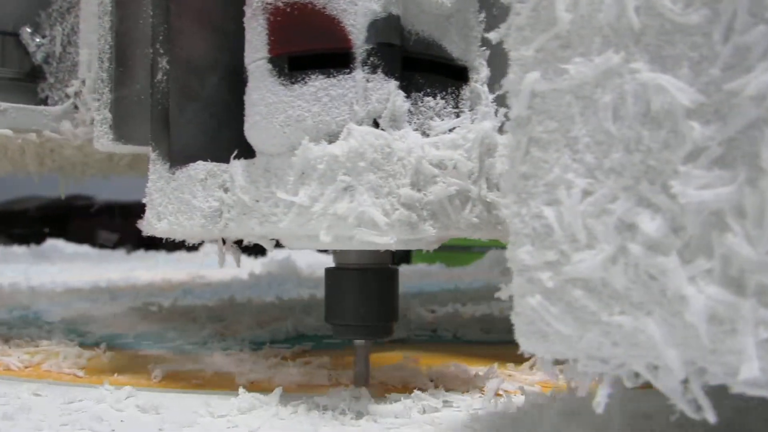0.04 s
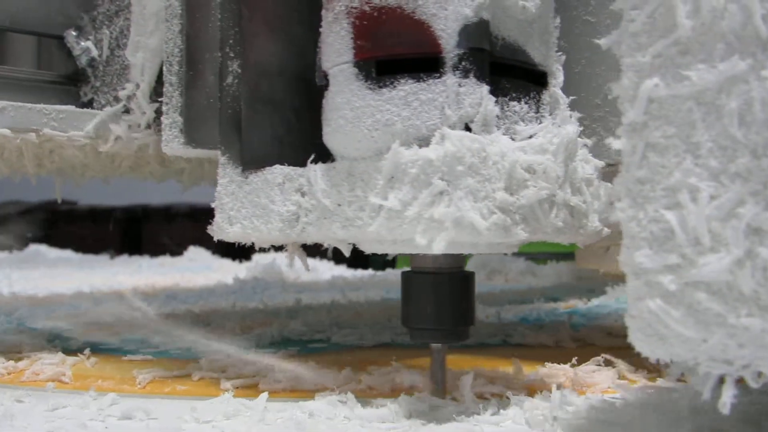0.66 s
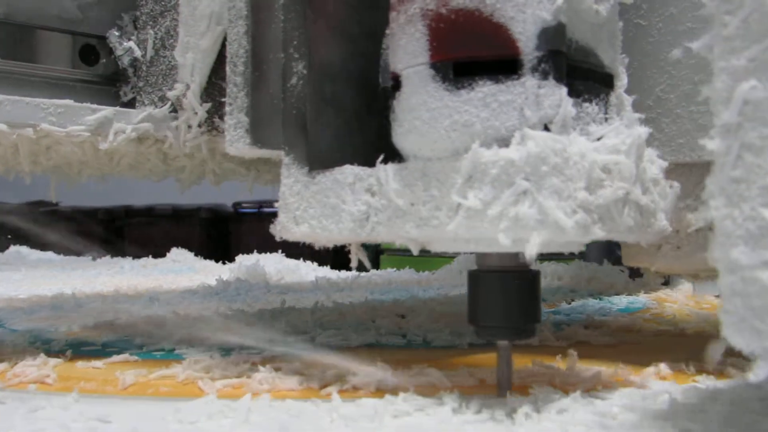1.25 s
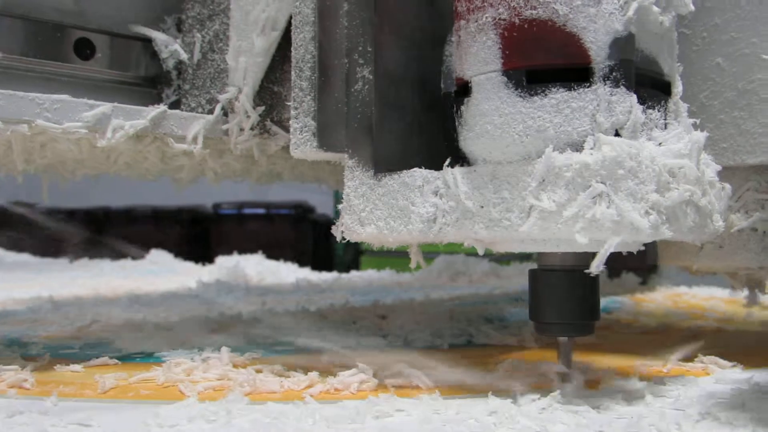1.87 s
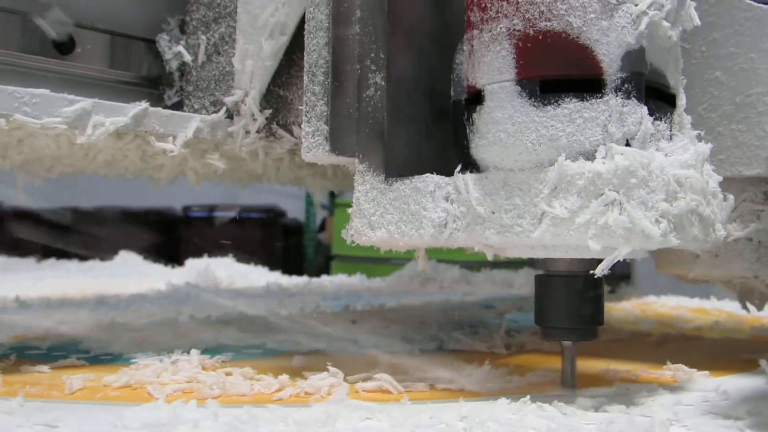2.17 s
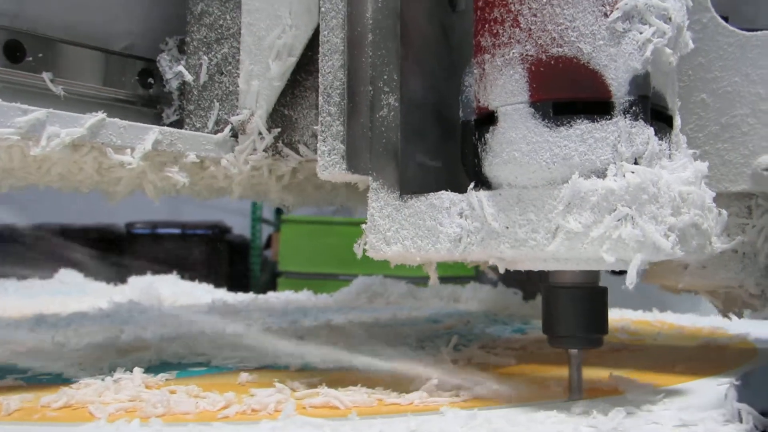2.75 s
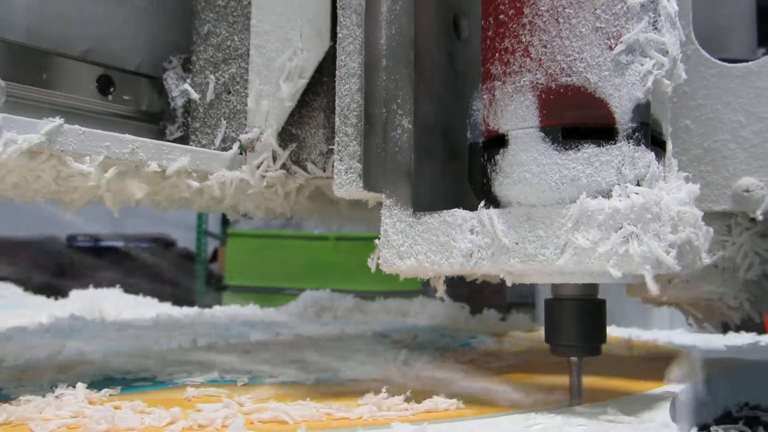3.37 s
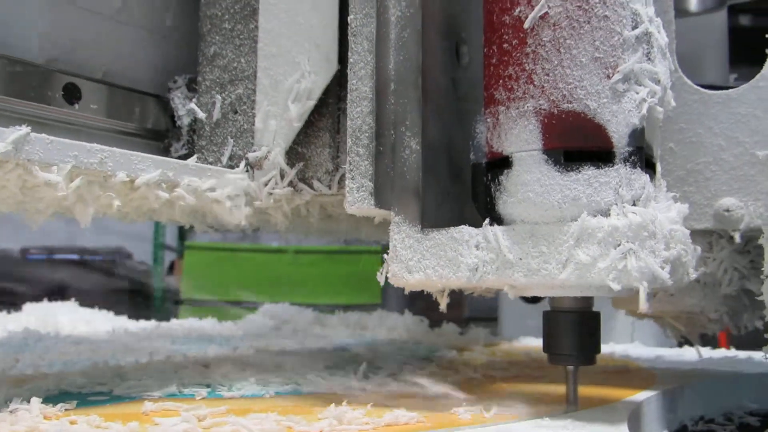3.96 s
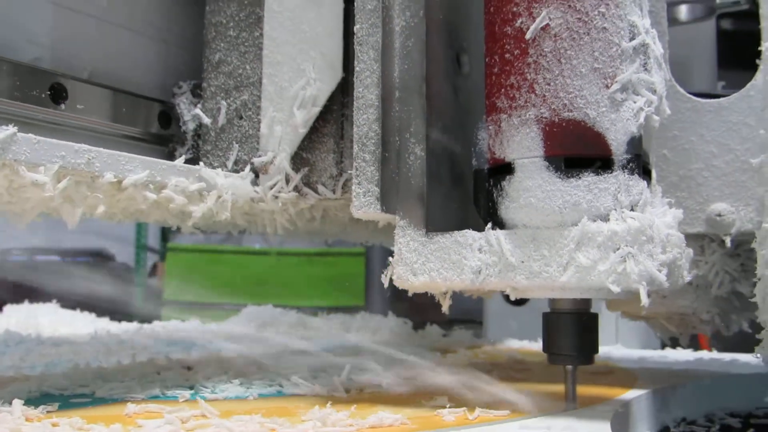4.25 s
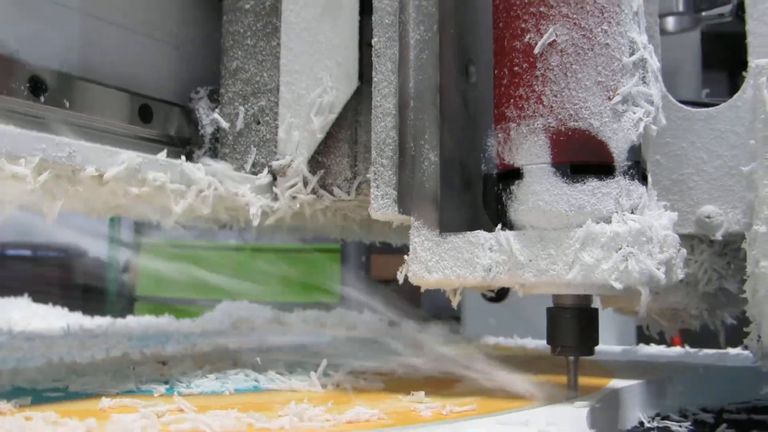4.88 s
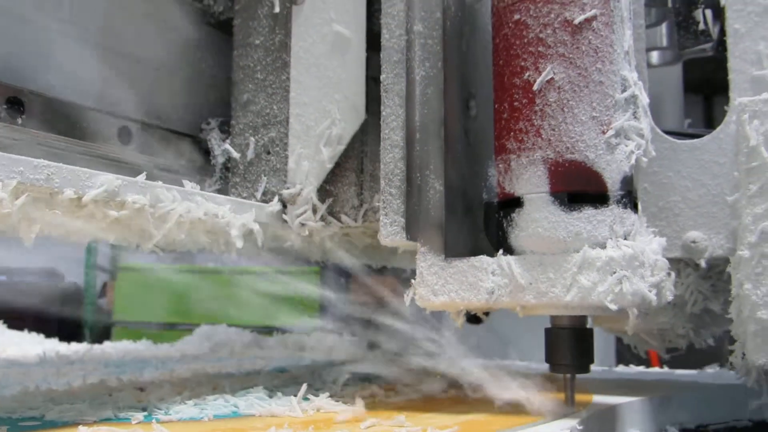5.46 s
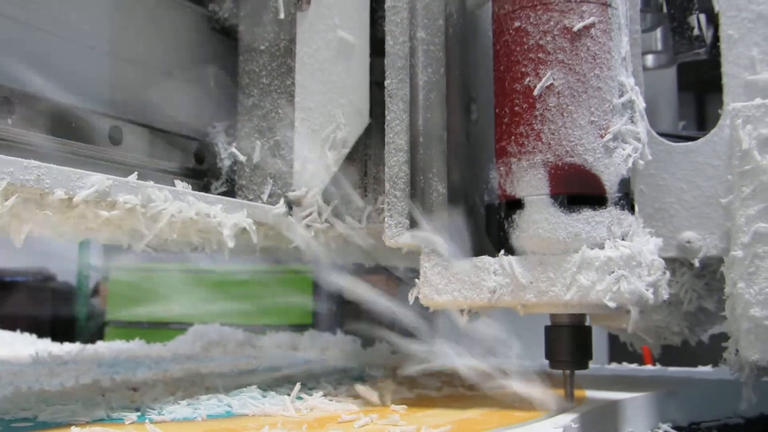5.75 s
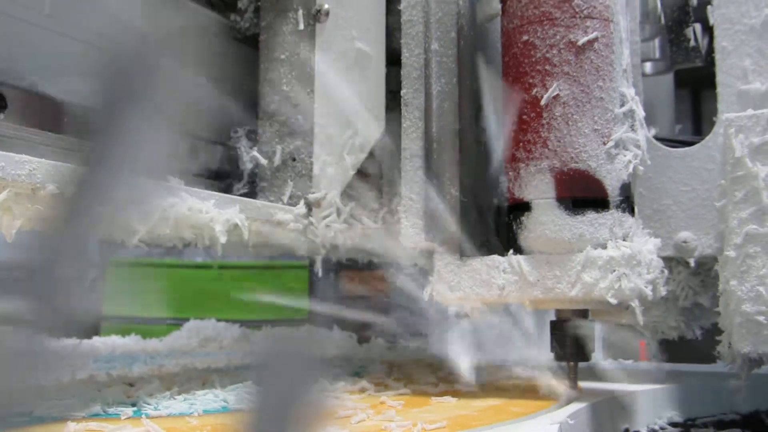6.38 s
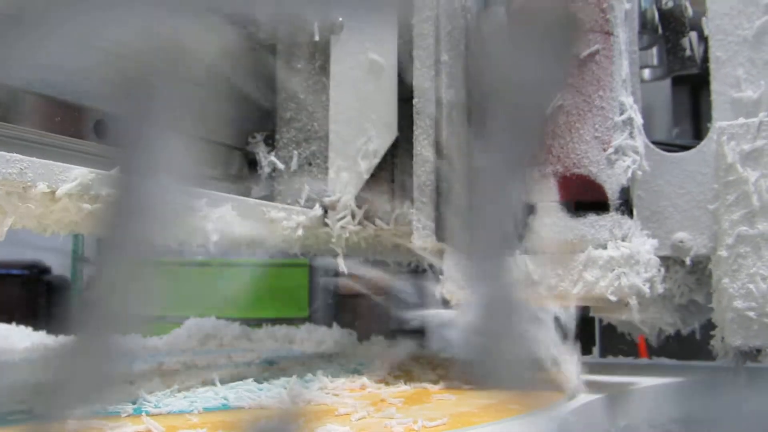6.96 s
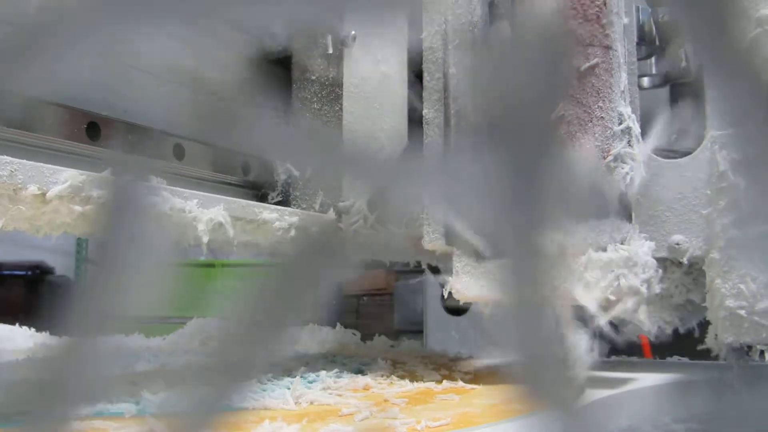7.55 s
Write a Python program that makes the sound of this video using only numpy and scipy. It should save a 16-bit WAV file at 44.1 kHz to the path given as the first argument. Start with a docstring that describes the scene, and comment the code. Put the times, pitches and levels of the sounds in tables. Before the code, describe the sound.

Close to a workshop router, a spinning bit gives a continuous whine with a growling edge as it tears through plastic with a hissing roar. Its tones swell and dip as the head travels. Draught thumps and rumbles on the microphone, hardest between two and three seconds, then eases away. Thin air whistles come and go above a faint fan hum, and the cut continues slightly softer to the end.

```python
"""A router's two-flute bit, turning about 241 times a second, sings as it cuts thick plastic sheet.
Its two flutes (cutting edges) make tones at even multiples of that rate, over the cut's roar and hiss.
As the head travels, quiet spots in the sound sweep past the microphone, an air jet whistles over the
groove, and drives and fans hum. The head's draught buffets the microphone, and a limiter turns the
volume down at the hardest slaps of air, then lets it creep back."""
import sys
import numpy as np
from scipy import signal
from scipy.fft import rfft, irfft, next_fast_len
from scipy.io import wavfile
from scipy.ndimage import uniform_filter1d, minimum_filter1d

SR = 44100
rng = np.random.default_rng(int(sys.argv[2]) if len(sys.argv) > 2 else 0)


def unload_audio(sound):
    """Save the sound as a 16-bit wav file, at the path given as the first command line argument."""
    columns = np.transpose(np.atleast_2d(sound))
    # keep every value between -1 and 1, then stretch to whole-number steps
    steps = np.round(np.clip(columns, -1, 1) * 32767)
    wavfile.write(sys.argv[1], SR, steps.astype(np.int16))


N = 340011
TIME = np.arange(N) / SR
FREQS = np.fft.rfftfreq(N, 1 / SR)


# The three strong tones, away from their quiet spots:
# name, left start/dB, left end/dB, right start/dB, right end/dB, left ear's lead/rad
BIT_TONES = [("first", -16, -17, -28, -24.2, 0.2), ("second", -15, -10.5, -18.5, -27, 0.43),
             ("third", -27.5, -22.5, -14.5, -31, -0.15)]

def flute_tones(angle, flutter_db=0.33, sway_db=0.9):
    """Two edges strike on each turn, making tones at 2, 4 and 6 times the turning rate."""
    out = np.zeros((2, N))
    for k, (tone, left_start, left_end, right_start, right_end, lead) in enumerate(BIT_TONES, 1):
        left = from_db(np.linspace(left_start, left_end, N)) * standing_wave(tone, "left")
        right = from_db(np.linspace(right_start, right_end, N)) * standing_wave(tone, "right")
        wave = np.exp(1j * (2 * k * angle + 2 * np.pi * rng.random()))
        ears = np.array([left * np.exp(1j * lead), right])
        waver = from_db(flutter_db * drift(25) + sway_db * drift(1.73))
        out += np.sqrt(2) * waver * (ears * wave).real
    return out


# Quiet spots that pass the microphone: tone, ear, t/s, signed speed/(half-widths per s),
# share of the tone left at the centre (below 0 the wave flips over)
QUIET_SPOTS = [("first", "left", 0.19, 0.24, 0.3), ("first", "right", 1, -0.54, -0.23),
               ("first", "left", 6.6, 1.7, 0.72), ("second", "left", 2.02, 0.29, 0.2),
               ("second", "right", 3, 0.54, 0.15), ("second", "left", 4.66, 0.64, 0.091),
               ("second", "right", 5.57, 1.8, -0.091), ("second", "left", 7.64, -1.5, 0.42),
               ("third", "right", 0.34, 0.72, .17), ("third", "right", 3.34, -0.6, 0.33),
               ("third", "left", 3.9, -1.03, .13), ("third", "left", 5.8, -.45, -0.14)]

def standing_wave(tone, ear):
    """A tone and its echoes partly cancel in places: each passing spot dips it and shifts its phase."""
    gain = np.ones(N, complex)
    for name, side, s, speed, share in QUIET_SPOTS:
        if (name, side) == (tone, ear):
            offset = 1j * speed * (TIME - s)
            gain *= (share + offset) / (1 + offset)
    return gain


# How fast the shaft spins: t/s, turning rate/Hz
SHAFT_SPEED = [(0, 240.92), (0.7, 241.1), (2, 241.07), (3.2, 241.29), (4.2, 241.83), (5.4, 242.48),
               (6.1, 242.54), (7.2, 242.08), (7.7, 242.03)]

def shaft_angle(jitter=0.00016):
    """How far the shaft has turned, in radians; the changing bite makes its speed tremble."""
    turns_per_s = curves(SHAFT_SPEED)[0] * (1 + jitter * drift(21.0))
    return 2 * np.pi * np.cumsum(turns_per_s) / SR


# The head's trip across the sheet: t/s, share of the trip done
HEAD_TRAVEL = [(0, 0), (1.2, 0.05), (2, 0.24), (3, 0.78), (4, 0.82), (5, 0.84), (7.7, 1)]

def progress():
    """How far the head has come, from 0 to 1; the tones and noises change with it."""
    return np.clip(curves(HEAD_TRAVEL)[0], 0, 1)


# The bit's weaker tones: multiple of the turning rate, level/dB, change over the trip/dB
GROWL_TONES = [(3, -41.5, -2.5), (5, -38, -10), (7, -35.5, 2.5), (8, -27, -9), (9, -29, -8), (10, -37, 0.5),
               (11, -36.5, -11), (12, -34.5, -5), (14, -39, -2.5), (15, -44, -5), (19, -44.5, -7)]

def growl(angle, odd_start_db=-16, odd_rise_s=0.39):
    """The bit growls; the odd multiples come in as one edge starts to bite deeper."""
    along = progress()
    odd_db = odd_start_db * np.exp(-TIME / odd_rise_s)
    return sum(shaft_tone(angle, round(multiple), db + change_db * along + round(multiple) % 2 * odd_db)
               for multiple, db, change_db in GROWL_TONES)


# How strong a whine tone starts out at each pitch: f/Hz, level/dB
WHINE_LEVELS = [(3850, -44), (4340, -40), (4800, -43), (5300, -55), (5790, -39.5), (6270, -44), (7300, -47),
                (9600, -50), (11500, -49), (12100, -41), (13500, -47)]

def whine(angle, fade_db=-8):
    """High, even multiples of the turning rate make a fine whine that fades as the head moves off."""
    faded_db = fade_db * progress()
    shaft_hz = curves(SHAFT_SPEED)[0].mean()
    hz, db = np.transpose(WHINE_LEVELS)
    return sum(shaft_tone(angle, k, np.interp(k * shaft_hz, hz, db) + faded_db) for k in range(16, 58, 2))


def shaft_tone(angle, multiple, db, waver_db=1.16, smear_rad=0.14, spread_rad=0.37):
    """One tone at a multiple of the turning rate, wavering in strength and direction."""
    phase = multiple * angle + smear_rad * drift(23) + 2 * np.pi * rng.random()
    lead = spread_rad * drift(0.79)
    return np.sqrt(2) * from_db(db + waver_db * drift(6.5)) * np.cos([phase + lead, phase - lead])


# How loud the cut is: t/s, roar/dB, hiss/dB
CUT_LEVELS = [(0, -22.5, -27), (1.1, -22.2, -25), (1.55, -21, -24.5), (2.4, -23, -26.5), (2.8, -23, -26.7),
              (3.4, -23, -26), (4.2, -23.5, -26.5), (4.9, -22.5, -26), (5.6, -23.5, -27),
              (6.7, -25.5, -29.5), (7.7, -24, -28.8)]
# The roar's colour (how strong each pitch is next to the others): f/Hz, trip start/dB, trip end/dB
ROAR_COLOUR = [(210, -19.5, -17), (302, -17.5, -9), (400, -17.5, -11.5), (640, -14, -7), (724, -6, -9),
               (1073, -6.5, -5), (1292, 0, 4.5), (1476, -8, -0.5), (1715, -3.5, 5), (2140, -6.5, -4.5),
               (2500, -9, -1), (2990, -11, -5), (3630, -10, -11), (4430, -47, -37)]
# The hiss's colour: f/Hz, trip start/dB, trip end/dB
HISS_COLOUR = [(2510, -51, -6), (3700, -1, -1.5), (4400, -1, 0), (5130, 1, 1), (5530, -4.5, 1),
               (6200, -1.5, 0), (7600, -0.5, 1.5), (8550, -1, 0.5), (9500, -1.5, -1.5), (10400, -1, 0.5),
               (10700, -4.5, -2.5), (12400, -3, -1.5), (14300, -5.5, -5), (14400, -14, -38.5)]

def cutting(hollow_hz=8400, hollow_width_hz=1500, hollow_at_s=4.4, hollow_depth=0.5):
    """The sheet roars and the chips hiss; as the head goes by, an echo off the sheet hollows the hiss."""
    roar_db, hiss_db = curves(CUT_LEVELS)
    roar = cut_noise(ROAR_COLOUR, roar_db, low_hz=160, flicker_db=0.45)
    hiss = cut_noise(HISS_COLOUR, hiss_db, low_hz=2000, flicker_db=0.47)
    cancelled = signal.lfilter(*signal.iirpeak(hollow_hz, hollow_hz / hollow_width_hz, fs=SR), hiss)
    return roar + hiss - hollow_depth * swell(TIME - hollow_at_s, spread_s=1.3) * cancelled


# How alike the cut sounds in the two ears: f/Hz, likeness (1 = the same)
EAR_LIKENESS = [(200, 0.71), (600, 0.96), (1300, 0.95), (2500, 0.77), (4000, 0.75), (7000, 0.67),
                (10000, 0.55), (14000, 0.16)]

def cut_noise(colours, db, low_hz, flicker_db):
    """Noise of tearing chips and air, blending from one colour to another as the head travels."""
    along, likeness = progress(), spectrum(EAR_LIKENESS)
    bass_cut_db = -10 * np.log10(1 + (low_hz / (FREQS + 1)) ** 4)
    start = noise_pair(spectrum(colours, column=1) + bass_cut_db, likeness)
    end = noise_pair(spectrum(colours, column=2) + bass_cut_db, likeness)
    return (np.sqrt(1 - along) * start + np.sqrt(along) * end) * from_db(db + flicker_db * drift(60))


# Breathy whistles: middle t/s, length/s, middle f/Hz, level/dB
JET_WHISTLES = [(1.7, 1.1, 10160, -35.5), (3.505, 1.1, 10100, -36), (4.902, 1.4, 10120, -39),
                (5.148, 1.8, 11960, -37.5), (6.502, 2.3, 11960, -38.5), (6.802, 1.9, 10350, -45)]

def whistles(width_hz=240, rise_hz_per_s=270):
    """The air jet crosses the groove: each narrow band of noise swells, climbs in pitch and fades."""
    out = np.zeros((2, N))
    for middle, length, hz, db in JET_WHISTLES:
        band = noise_pair(-20 * np.log10(1 + (FREQS / width_hz) ** 2), likeness=0.45)
        t = TIME - middle
        arch = np.cos(np.pi * np.clip(t / length, -.5, .5))
        # slide the low band of noise up to the whistle's pitch
        shift = np.exp(2j * np.pi * np.cumsum(hz - width_hz / 2 + rise_hz_per_s * t) / SR)
        out += from_db(db) * arch * (signal.hilbert(band, next_fast_len(N))[:, :N] * shift).real
    return out


# How hard the head's draught blows: t/s, level/dB
DRAUGHT_LEVELS = [(0, -61), (.7, -46), (1.6, -30.5), (2.5, -20), (3.4, -25.5), (4.3, -32), (5.3, -37),
                  (7.7, -39)]
# The colour of its rumble and thumps: f/Hz, relative level/dB
WIND_COLOUR = [(15, -32), (40, -5.5), (90, -7.5), (250, -7.5), (400, -12.5), (600, -17), (900, -41),
               (1500, -47), (3000, -55)]

def draught(trim_db=-3, lumps_db=6, dull_hz=600):
    """Air from the head flows over the microphone with a dull, lumpy rumble."""
    treble_cut_db = -10 * np.log10(1 + (FREQS / dull_hz) ** 2)
    rumble = noise_pair(spectrum(WIND_COLOUR) + treble_cut_db, likeness=-0.84)
    return rumble * from_db(curves(DRAUGHT_LEVELS)[0] + trim_db + lumps_db * np.tanh(drift(32)))


# The strongest gusts: t/s, thump/dB, rasp/dB
STRONG_GUSTS = [(1.583, -10, -19), (1.638, -14.5, -27), (1.726, -21, -25), (2.124, -15, -18),
                (2.344, -19, -27), (2.507, -17, -23), (2.802, -9, -7), (3.01, -14, -15), (3.178, -12, -13),
                (3.553, -18, -17), (3.805, -16, -10)]
# The colour of the rasp from the fastest swirls of air: f/Hz, relative level/dB
RASP_COLOUR = [(150, -23), (400, 4.5), (550, 0), (800, 0), (1200, -3), (2000, -30), (4000, -55)]

def gusts(puffs_per_s=18, puff_thump_db=2.5, puff_rasp_db=2, scatter_db=5.5):
    """Gusts thump and rasp on the microphone: a few strong ones among many random puffs."""
    arrivals = rng.random(N) < puffs_per_s / SR
    puffs = arrivals * from_db(curves(DRAUGHT_LEVELS)[0] + scatter_db * rng.uniform(-1, 1, N))
    thumps, rasps = puffs * from_db(puff_thump_db), puffs * from_db(puff_rasp_db)
    for s, thump_db, rasp_db in STRONG_GUSTS:
        thumps[round(s * SR)], rasps[round(s * SR)] = from_db(thump_db), from_db(rasp_db)
    t = np.arange(-SR // 20, SR // 20) / SR
    thump = signal.oaconvolve(thumps, swell(t, spread_s=0.0094), "same")
    rasp = signal.oaconvolve(rasps, swell(t, spread_s=0.0047), "same")
    return thump * swirls(WIND_COLOUR, likeness=-0.91) + rasp * swirls(RASP_COLOUR, likeness=-0.81)


def swirls(colour, likeness):
    """Churning air of even strength pushes on one microphone opening as it pulls on the other."""
    swirl = noise_pair(spectrum(colour), likeness)
    return swirl / np.sqrt(uniform_filter1d(np.mean(swirl ** 2, axis=0), size=260))


# Hard slaps of air: t/s, peak level/dB, starting f/Hz, rise/s, left over right/dB
AIR_SLAPS = [(1.3215, 2.2, 800, .0018, 3.5), (1.326, -5, 170, .002, 4), (2.003, 4.8, 260, .0025, -2.5),
             (2.312, 5.8, 550, .0009, 3.5), (2.598, 7.5, 480, .0009, 2)]

def slaps():
    """A fast swirl hits one side harder: the pressure swings a few times, ever more slowly."""
    out = np.zeros((2, N))
    for s, db, hz, rise, pan_db in AIR_SLAPS:
        age = np.maximum(TIME - s, 0) / rise
        swing = age * np.exp(-age) * np.sin(4 * np.pi * hz * rise * np.log1p(age / 2))
        sides = np.array([[from_db(min(pan_db, 0))], [-from_db(min(-pan_db, 0))]])
        out += from_db(db) * sides * swing / abs(swing).max()
    return out


# The background hum: f/Hz, trip start/dB, trip end/dB
HUM_TONES = [(119.2, -53, -54.5), (280.1, -44, -44), (285.2, -45, -56), (314.2, -51, -45.5),
             (357, -46, -55), (602, -51, -53.5), (1284, -50, -52), (1700, -36, -65), (2463, -52, -60),
             (2714, -42, -37)]

def hums(waver_db=2, smear_rad=0.2, spread_rad=0.64):
    """The fans and the drives that move the head hum unsteadily."""
    out, along = np.zeros((2, N)), progress()
    for hz, start_db, end_db in HUM_TONES:
        gain = from_db(start_db + (end_db - start_db) * along + waver_db * drift(19))
        phase = 2 * np.pi * (hz * TIME + rng.random()) + smear_rad * drift(18.0)
        lead = spread_rad * drift(1.3)
        out += np.sqrt(2) * gain * np.cos([phase + lead, phase - lead])
    return out


def from_db(db):
    """Turns decibels into a number to multiply by."""
    return 10 ** (np.asarray(db) / 20)


def unit(x):
    """Scales a signal to a typical size (rms) of 1."""
    return x / np.sqrt(np.mean(abs(x) ** 2) + 1e-20)


def swell(t, spread_s):
    """A bell curve of height 1 around t = 0."""
    return np.exp(-(t / spread_s) ** 2 / 2)


def curves(rows):
    """Joins the dots of a time table, giving each column a value at every sample."""
    s, *columns = np.transpose(rows)
    return [np.interp(TIME, s, c) for c in columns]


def spectrum(rows, column=1):
    """Joins the dots of a frequency table, giving one column a value at every frequency."""
    table = np.transpose(rows)
    return np.interp(np.log(FREQS + 1), np.log(table[0]), table[column])


def drift(hz, size=2048):
    """A random wobble of typical size 1, with up to about hz swings a second."""
    f = np.fft.rfftfreq(size, TIME[-1] / size)
    slow = irfft(rfft(rng.standard_normal(size)) * np.exp(-(f / hz) ** 2))
    return np.interp(TIME, np.linspace(0, TIME[-1], size), unit(slow))


def noise_pair(db, likeness):
    """Left and right noise with the colour db; likeness 1 makes them the same, -1 opposite."""
    size = next_fast_len(N)
    left, other = rfft(rng.standard_normal((2, size)))
    stretch = lambda v: np.interp(np.linspace(0, 1, len(left)), np.linspace(0, 1, len(db)), v + 0 * db)
    shared = np.clip(stretch(likeness), -1, 1)
    right = shared * left + np.sqrt(1 - shared ** 2) * other
    return unit(irfft(np.array([left, right]) * from_db(stretch(db)), size)[:, :N])


def scene():
    """The router at work, and its draught on the microphone."""
    angle = shaft_angle()
    machine = flute_tones(angle) + growl(angle) + whine(angle) + hums() + cutting()
    return machine + whistles() + draught() + gusts() + slaps()


def record(dry, ceiling_db=-1.0, recover_db_per_s=3.0, top_hz=14900):
    """A limiter ducks at peaks and creeps back; filters cut two narrow bands and the highest treble."""
    peak_db = 20 * np.log10(abs(uniform_filter1d(dry, size=8, axis=1)).max(axis=0) + 1e-9)
    creep_db = recover_db_per_s * TIME
    duck_db = np.maximum(np.maximum.accumulate(peak_db - ceiling_db + creep_db) - creep_db, 0)
    out = dry * from_db(uniform_filter1d(minimum_filter1d(-duck_db, size=100), size=100))
    for hz, width_hz in [(3945, 165), (7875, 200)]:
        out = signal.lfilter(*signal.iirnotch(hz, hz / width_hz, fs=SR), out)
    lowpass = signal.firwin(401, top_hz, window=("kaiser", 9), fs=SR)
    return signal.oaconvolve(out, lowpass[None], "same")


dry = scene()
out = record(dry)
unload_audio(out)
```